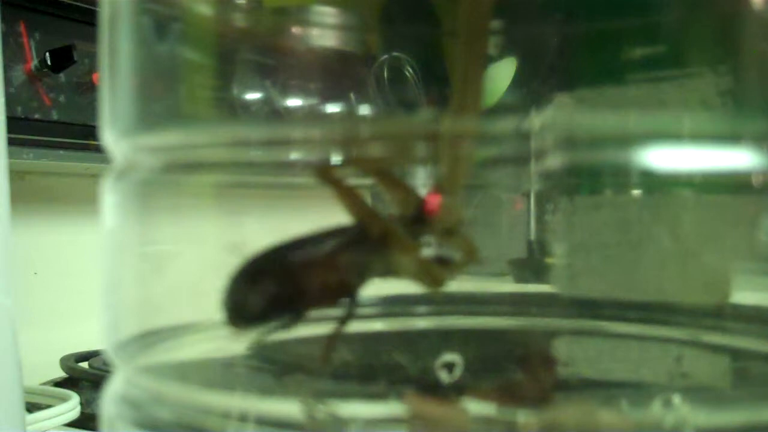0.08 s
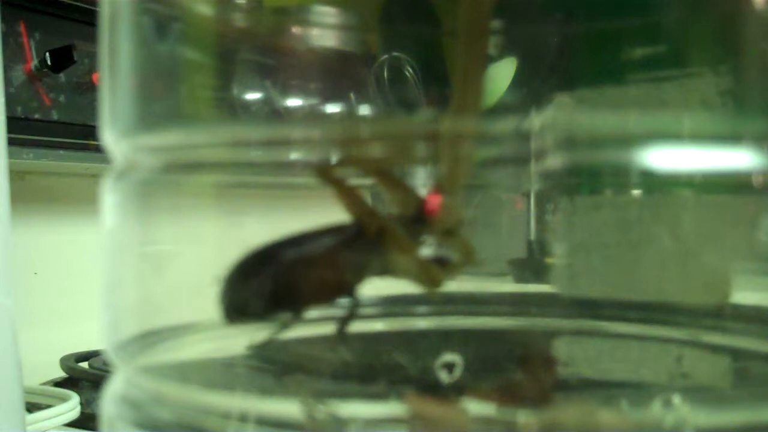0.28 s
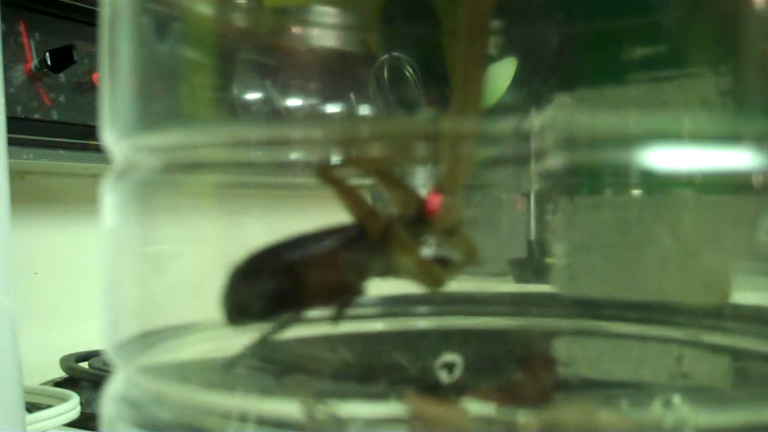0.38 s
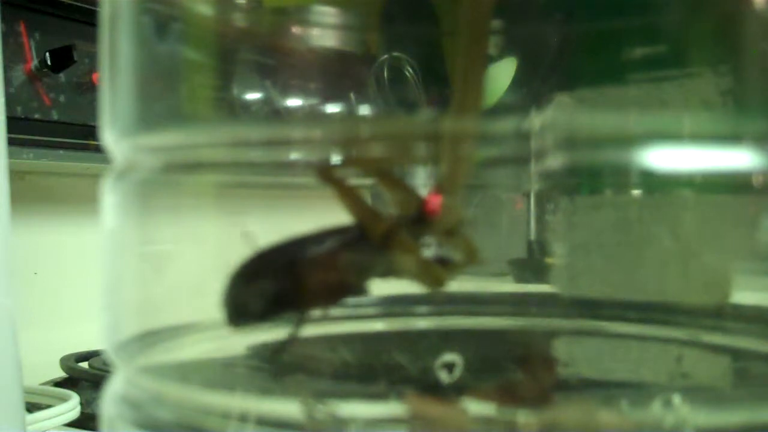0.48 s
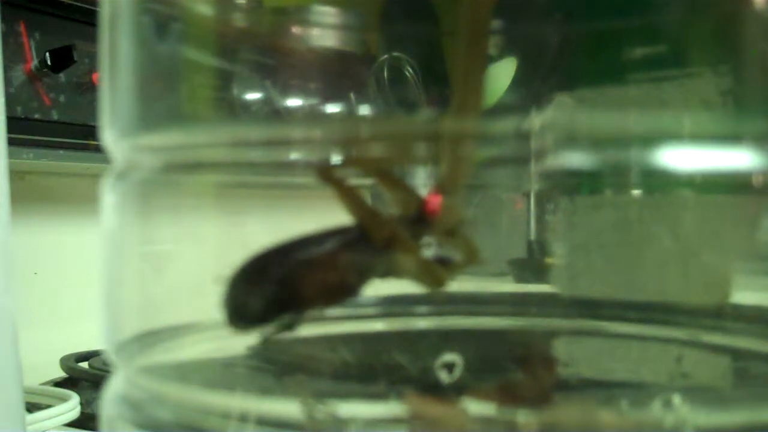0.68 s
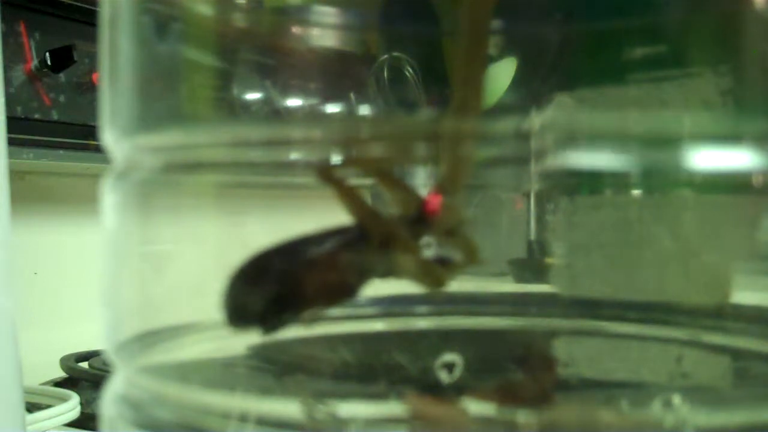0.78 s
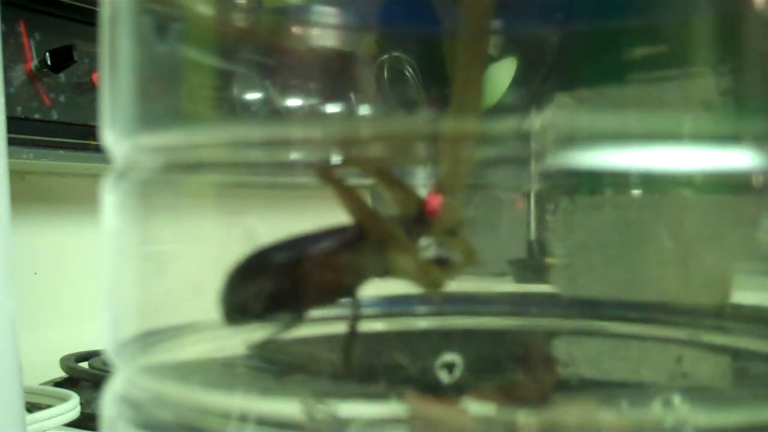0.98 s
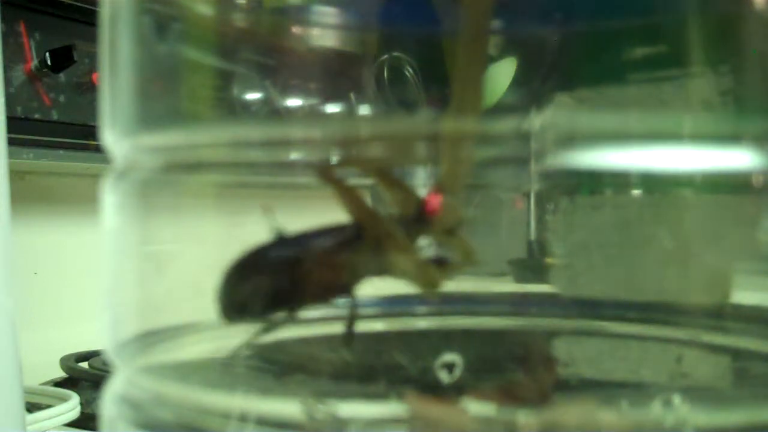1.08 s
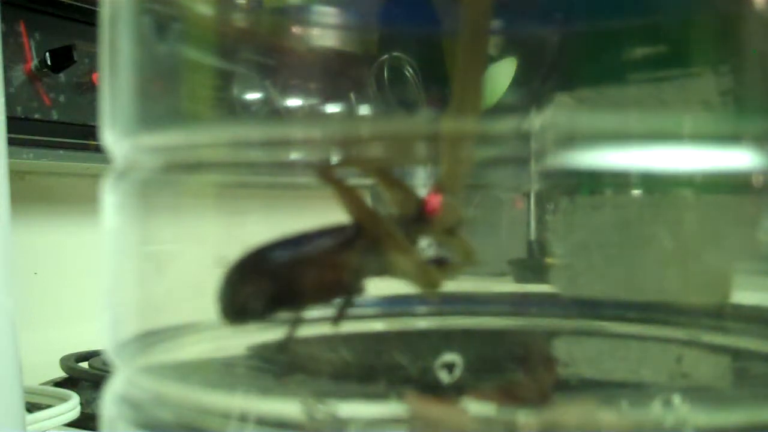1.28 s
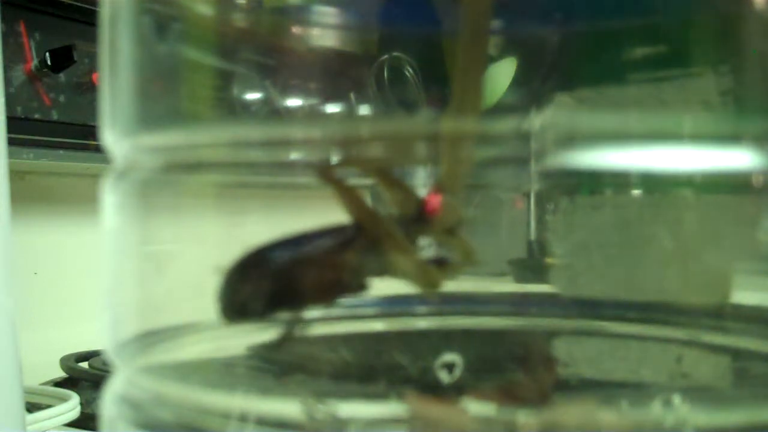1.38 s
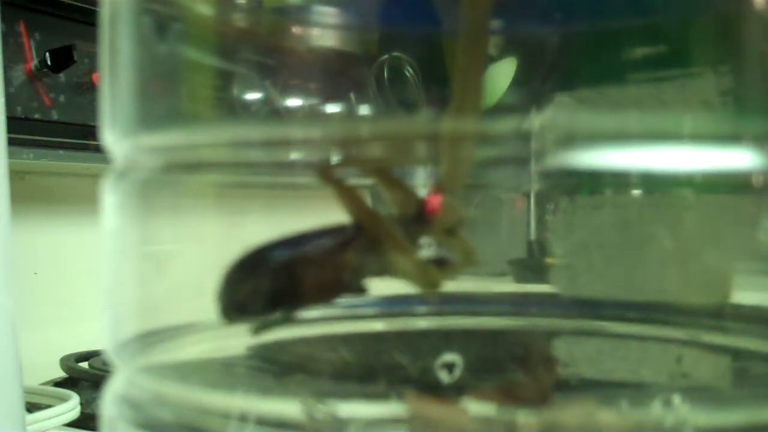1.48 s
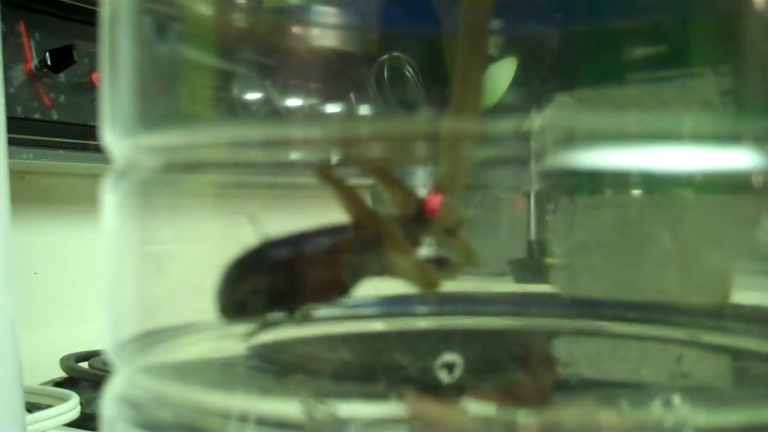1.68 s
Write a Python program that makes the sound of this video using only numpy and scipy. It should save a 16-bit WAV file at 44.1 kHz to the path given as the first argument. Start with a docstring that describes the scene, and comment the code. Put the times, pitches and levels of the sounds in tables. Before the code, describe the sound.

Beetle claws scrape a plastic jar, close to a stereo microphone in a quiet room. After faint hiss, two sharp, hollow knocks click at 0.22 and 0.24 seconds, with a weaker tick at 0.26. Dense, bright, raspy strokes follow around 0.45-0.57 and 0.9-1.15, with a tiny tick at 0.89, then an uneven scrape from 1.3, strongest at 1.7. Low rustle and faint hum lie underneath.

```python
"""Beetle in a plastic jar

A beetle in a clear plastic jar, close to a camera's microphone pair in a quiet room.
Its claws drag over the wall in three hissing strokes: dense tiny slips ring the wall's resonances.
Short bursts make the ticks. Two quick knocks and a fainter one ring the low modes of jar and table.
Under it: shaped noise for the microphone hiss and a low rustle, two faint narrow bands, and sine hum.
"""
import sys
import numpy as np
from scipy import signal
from scipy.fft import rfft, irfft, next_fast_len
from scipy.io import wavfile
from scipy.ndimage import uniform_filter1d

SR = 44100
rng = np.random.default_rng(int(sys.argv[2]) if len(sys.argv) > 2 else 0)


def transcribe(signal):
    """Save signal, clipped to [-1, 1], as a 16-bit WAV file at the path in sys.argv[1]."""
    frames = np.atleast_2d(signal).T
    limited = np.clip(frames, -1, 1)
    pcm = np.round(limited * 32767).astype(np.int16)
    wavfile.write(sys.argv[1], SR, pcm)


def voltage_ratio(decibels):
    """Convert decibels (scalar or array-like) to amplitude ratios, 20 dB per decade."""
    exponent = np.asarray(decibels, float) / 20
    return 10 ** exponent


N = 74970  # length in samples
SIDE = np.array([[.5], [-.5]])  # shares a left-minus-right difference between the two channels
PIVOT_HZ = 5000  # brightness changes leave this pitch alone

# How the strokes of the claws swell and change in tone.
# Each row: time in seconds, level in dB before the tone change, brightness in dB per octave.
STROKES = [(.0, -86, -2), (.33, -74, -1), (.4, -68.5, 4), (.46, -58, 1), (.51, -57.5, 0.7),
           (0.556, -59.5, -2), (.572, -79, .1), (.7, -80, 2), (.885, -68.5, -2), (.897, -61, -0.5),
           (.925, -67, -2), (1.0, -64, -3.5), (1.06, -59.5, -0.5), (1.125, -56.5, -0.5), (1.143, -62, -2),
           (1.158, -68, 0.5), (1.31, -72.5, 5), (1.34, -63.5, -3), (1.38, -71, 7), (1.42, -65.5, 9.5),
           (1.53, -66.5, 1), (1.565, -63.5, 9), (1.63, -59, -1), (1.665, -62.5, 6), (1.7, -54, .1)]


def scraping():
    """Dense tiny slips of the claws, in an unsteady grip, ring the wall; a broad rasp goes with them."""
    # Broad part of the scraping. Each row: frequency in Hz, relative level in dB per Hz.
    rasp_tone = [(1000, -56), (1800, 15), (2500, -11), (4000, 7.5), (6000, 5), (7500, 1), (8600, -57),
                 (10000, -21), (13000, -55)]
    slips_per_s, slip_spread_db = 2500, 0.5
    flutter_db, flutter_s = 1, 0.005  # rms swing of the grip, and its smoothing time
    rasp_db, rasp_pan_db, rasp_same = -7, 4, .5  # level against the force, left minus right, likeness

    draw, sign, grip = rng.random((N, 3)).T
    happens = draw < slips_per_s / SR
    strength = voltage_ratio(slip_spread_db * np.minimum(rng.exponential(1, N), 5))
    slips = evened(happens * np.sign(sign - .5) * strength)

    span = round(flutter_s * SR)
    wander = uniform_filter1d(uniform_filter1d(grip - .5, span), span)
    force = evened(voltage_ratio(flutter_db * evened(wander))) * level(STROKES)

    ringing = wall(slips * force) / np.std(wall(slips))
    rasp = noise(rasp_tone, lambda hz: rasp_same + 0 * hz, 1.0)
    rasp *= voltage_ratio(rasp_db + rasp_pan_db * SIDE)
    return tilted(ringing + rasp * force)


def wall(x):
    """The wall's resonances, each reaching the two microphones in its own way."""
    # Resonances of the wall under the claws. Each row: frequency in Hz, width in Hz of each of two
    # filter stages, relative level in dB, left minus right in dB, left lead in radians (negative: lag).
    resonances = [(2450, 90, -4, -3, -.4), (3280, 90, -2.5, 1.5, -.5), (3750, 140, -8, 3, -.6),
                  (3900, 80, -5, -1.5, -.6), (4500, 170, -.5, -1.5, -.7), (5350, 200, -1, 4, -.6),
                  (5570, 190, 1, -1, -.6), (5900, 260, -6, -5, -.9), (6380, 120, -6, -3, -.9),
                  (6650, 110, -7, -4, -1), (7100, 210, 2, 7, -1), (7450, 170, -2, 9, -1),
                  (7920, 110, -6, 9, -1), (8320, 90, -7, 11, -1)]
    out = np.zeros((2, N))
    for hz, width, db, pan_db, lead in resonances:
        z = ring(x, hz, width)
        left_right = np.array([(z * np.exp(1j * lead)).real, z.real])
        out += voltage_ratio(db + pan_db * SIDE) * left_right
    return out


def tilted(x):
    """Brightens or dulls x over time as the strokes change."""
    hz, t, z = signal.stft(x, SR, nperseg=256)
    s, _, tilt_db = np.transpose(STROKES)
    octaves = np.log2(np.clip(hz, 2000, 9000) / PIVOT_HZ)
    z *= voltage_ratio(np.outer(octaves, np.interp(t, s, tilt_db)))
    return signal.istft(z, SR, nperseg=256)[1][:, :N]


def ticks():
    """Short cracks of claw and shell that ring the wall and leave a brief tail in the jar."""
    # The ticks. Each row: start in seconds, short-time peak level in dB before panning, ringing and
    # tail, brightness in dB per octave, decay time constant in ms (at least 0.05 is used).
    cracks = [(.2244, -30, -3, .2), (.2256, -24, 3, .25), (.2270, -36, -2, .5), (.2396, -41, 5, 1.1),
              (.241, -33, 5, .7), (.2437, -33, -5, .5), (.2525, -47, -4, 1.8), (.2645, -52, 6, .8),
              (.276, -54, 6, .5), (.8924, -43, -2, .05)]
    # Tone all ticks share. Each row: frequency in Hz, relative level in dB per Hz.
    crack_tone = [(700, -50), (1300, -18), (2000, -13), (3050, -15), (3550, 0), (4050, -10), (5400, -8),
                  (5900, -10), (6300, -3), (6900, -7), (7400, -3), (8200, -11), (9200, -14), (10200, -24),
                  (14000, -38)]
    # Balance of the ticks. Each row: frequency in Hz, left minus right in dB.
    crack_pan = [(1500, 23.5), (3500, -8.3), (5500, -2), (6500, 13.5), (7500, 3), (9000, 7), (12000, 3)]
    ring_db, left_lag_s = -28, 4e-5
    tail_db, tail_t60 = -10, 0.067  # t60: seconds to fall by 60 dB

    dry, t, hz = np.zeros(N), np.arange(512) / SR, np.fft.rfftfreq(1024, 1 / SR)
    for s, db, tilt_db, ms in cracks:
        signs = rng.choice([-1., 1.], 512)
        burst = (signs + 3 * (t == 0)) * np.exp(-t * 1000 / max(ms, .05))  # sharpened first sample
        tone_db = read(crack_tone, hz) + tilt_db * np.log2((hz + 50) / PIVOT_HZ)
        burst = irfft(rfft(burst, 1024) * causal(voltage_ratio(tone_db)))[:512]
        peak = np.sqrt(np.max(uniform_filter1d(2 * burst ** 2, size=20)))
        add(dry, s, voltage_ratio(db) * burst / peak)

    def panned(f):
        return voltage_ratio(SIDE * read(crack_pan, f)) * np.exp(-2j * np.pi * f * left_lag_s * SIDE)

    near = colour(dry, panned)
    t = np.arange(4000) / SR
    tail = rng.standard_normal((4000, 2)).T * voltage_ratio(-60 * t / tail_t60)
    tail = signal.fftconvolve(near, tail / np.linalg.norm(tail[0]), axes=1)[:, :N]
    return near + voltage_ratio(ring_db) * wall(dry) + voltage_ratio(tail_db) * tail


def knocks():
    """Smooth pushes on wall or base set the low modes of jar and table ringing."""
    # The pushes. Each row: start in seconds, strength in dB (summed over the push), contact time in ms,
    # direction as a sign, spot (0 wall, 1 base).
    pushes = [(.2244, -39, .35, -1, 0), (.2254, -30, 1, -1, 0), (.2408, -40, .4, -1, 1),
              (.2416, -29, 1.05, -1, 1), (.2645, -47, 1.1, 1, 1)]
    # Modes of jar and table. Each row: frequency in Hz, level in dB when struck on the wall,
    # level in dB when struck on the base, seconds to fall by 60 dB.
    jar_modes = [(135.7, -25, -22.5, 0.28), (195.8, -51, -15, 0.25), (313, -35, -35, 0.28),
                 (370, -14, -1, .05), (396, -4, -12, .14), (423, -4, -12, .1), (439.6, -20.5, -14.5, 0.21),
                 (590, -39, -32, 0.015), (663, -11.5, -14, 0.043), (777, -34, -3, 0.032),
                 (1000, -19, -18, 0.062), (1090, -2.5, -8.5, 0.05), (1240, 1.5, 6, 0.033),
                 (1634, -36, 1, 0.018), (1807, -8.5, -11, 0.09), (2120, -29, -13, 0.012),
                 (2334, -6, -5, 0.052)]

    force, t = np.zeros((2, N)), np.arange(N) / SR
    for s, db, ms, way, spot in pushes:
        u = np.clip((t - s) * 1000 / ms, 0, 1)  # progress through the contact
        force[round(spot)] += way * voltage_ratio(db) * np.sin(np.pi * u) ** 2 / (ms * SR / 2000)

    t = t[:SR // 2]
    modes = np.zeros((2, len(t)))
    for hz, wall_db, base_db, t60 in jar_modes:
        start_db = np.array([[wall_db], [base_db]])
        modes += voltage_ratio(start_db - 60 * t / t60) * np.sin(2 * np.pi * hz * t)
    ringing = signal.fftconvolve(force, modes, axes=1).sum(0)[:N]
    # the small jar radiates little below 132 Hz
    high = signal.butter(4, 132, "high", fs=SR, output="sos")
    return signal.sosfilt(high, ringing)


def rustle():
    """A low room rustle: dark, patchy noise that comes and goes."""
    # Swell of the rustle. Each row: time in seconds, level in dB before panning.
    swell = [(.2, -66), (.35, -65), (.5, -68), (.6, -67), (.7, -61), (.8, -63.5), (.87, -62.5),
             (1.0, -63.5), (1.1, -67.5), (1.25, -66), (1.4, -67), (1.6, -64), (1.7, -68)]
    # Tone of the rustle. Each row: frequency in Hz, relative level in dB per Hz.
    dark_tone = [(71, -36), (120, -34), (206, -15.5), (357, -4), (426, -3), (770, -2.5), (3000, -16),
                 (3900, -41), (6600, -120)]
    same, pan_db, patchy_db = 0.29, 5, 2  # left-right likeness, left minus right, rms of the patches
    return level(swell) * noise(dark_tone, lambda hz: same + 0 * hz, patchy_db) * voltage_ratio(pan_db * SIDE)


def hiss():
    """Steady microphone hiss: shaped noise, partly alike in the two channels."""
    # Tone of the hiss. Each row: frequency in Hz, relative level in dB per Hz.
    hiss_tone = [(15, -43), (25, 3.5), (90, -7), (140, -5.5), (250, -6.5), (400, -6.5), (800, -10.5),
                 (1300, -7.5), (4080, -9), (14000, -16.5), (14500, -34)]
    # Left-right likeness. Each row: frequency in Hz, likeness from -1 (opposite) to 1 (identical).
    likeness = [(60, -0.49), (240, 0.37), (940, 0.6), (3730, -0.34), (14800, -0.11)]
    hiss_db, pan_db = -60.5, 2.45  # level before panning, left minus right
    return voltage_ratio(hiss_db + pan_db * SIDE) * noise(hiss_tone, lambda hz: read(likeness, hz), 0.8)


def narrow_hiss():
    """Two faint narrow bands of hiss that never stop, stronger on the right."""
    # The bands. Each row: frequency in Hz, width in Hz of each of two filter stages,
    # level in dB (3 dB above the heard rms, before panning), left minus right in dB.
    bands = [(6210, 200, -75, -11), (7920, 110, -89, -19)]
    out = np.zeros((2, N))
    for hz, width, db, pan_db in bands:
        white = rng.standard_normal((N, 2)).T
        out += voltage_ratio(db + pan_db * SIDE) * ring(white, hz, width).real
    return out


def hum():
    """Faint mains hum: steady sines with random starting phases, the same on both sides."""
    # Partials of the hum. Each row: frequency in Hz, rms level in dB.
    partials = [(120, -85), (360, -80), (720, -81.5), (1200, -82), (1440, -83.5), (1680, -83.5)]
    t = np.arange(N) / SR
    return sum(np.sqrt(2) * voltage_ratio(db) * np.sin(2 * np.pi * (hz * t + rng.random())) for hz, db in partials)


def noise(tone, same, patchy_db):
    """Stereo noise of a given spectrum with drifting patches, overall rms 1."""
    hz = np.fft.rfftfreq(512, 1 / SR)
    patch = rng.standard_normal((N // 128 + 6, 257)).T
    patch = evened(uniform_filter1d(uniform_filter1d(patch, 6, 0), 20, 1))  # smooth over pitch and time
    spectra = pair(same(hz)[:, None]) * voltage_ratio(patchy_db * patch)
    white = signal.istft(spectra, nperseg=512, noverlap=384)[1][:, :N]
    return evened(colour(white, lambda f: voltage_ratio(read(tone, f))))


def pair(same):
    """Two white noises of the given likeness by frequency, as short-time spectra."""
    a, b, c, d = rng.standard_normal((N // 128 + 6, 257, 4)).T
    same = np.clip(same, -1, 1)
    first, other = a + 1j * b, c + 1j * d
    return np.array([first, same * first + np.sqrt(1 - same ** 2) * other])


def ring(x, hz, width):
    """A steep resonance (two equal stages) as a complex signal, of unit total power on white noise."""
    turn, r = np.exp(2j * np.pi * hz * np.arange(N) / SR), np.exp(-np.pi * width / SR)
    # shift the resonance down to 0 Hz, smooth there, shift back
    return turn * signal.lfilter([2 * (1 - r) ** 1.5], [1, -2 * r, r * r], x / turn)


def colour(x, gain):
    """Filters x by a complex gain(hz)."""
    size = next_fast_len(x.shape[-1] + 4096)
    return irfft(rfft(x, size) * gain(np.fft.rfftfreq(size, 1 / SR)), size)[..., :x.shape[-1]]


def causal(gain):
    """Adds the phase that makes a gain on an rfft grid ring after, not before."""
    log = np.log(np.maximum(gain, 1e-5))
    return np.exp(np.conj(signal.hilbert(np.r_[log, log[-2:0:-1]])))[:len(gain)]


def read(points, hz):
    """Reads a frequency table on a log-frequency axis."""
    f, value = np.transpose(points)
    return np.interp(np.log(hz + 1), np.log(f + 1), value)


def level(curve):
    """A dB curve over time as gain per sample."""
    s, db = np.transpose(curve)[:2]
    return voltage_ratio(np.interp(np.arange(N) / SR, s, db))


def evened(x):
    """Scales x to rms 1."""
    return x / np.sqrt(np.mean(x ** 2) + 1e-20)


def add(mix, s, sound):
    """Mixes a sound in at time s in seconds."""
    mix[round(s * SR):][:len(sound)] += sound


def scene():
    """All sources at the two microphones."""
    return scraping() + ticks() + knocks() + rustle() + hiss() + narrow_hiss() + hum()


def band_limit(x):
    """A steep low-pass at the top of the band."""
    return signal.sosfilt(signal.butter(12, 15350, fs=SR, output="sos"), x)


def record(dry):
    """The finished mix as the camera keeps it."""
    return band_limit(dry)


dry = scene()
out = record(dry)
transcribe(out)
```